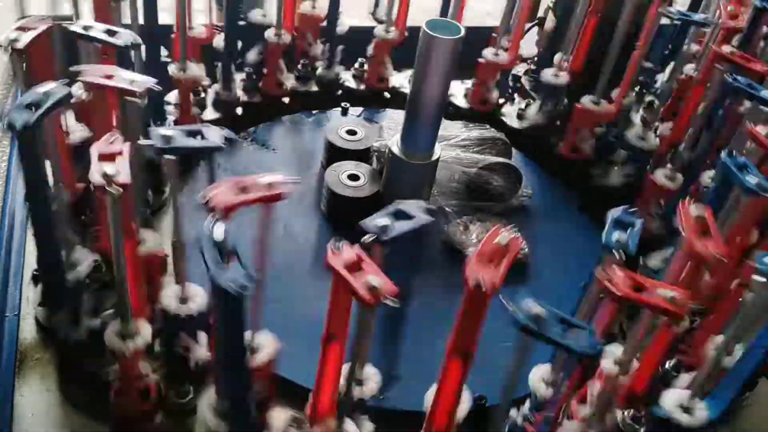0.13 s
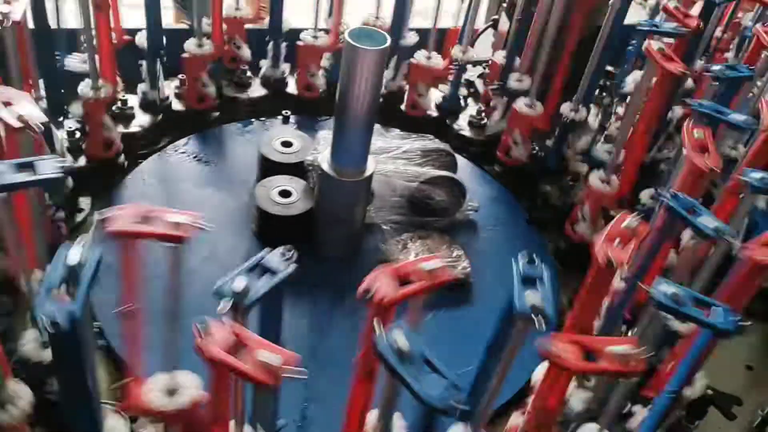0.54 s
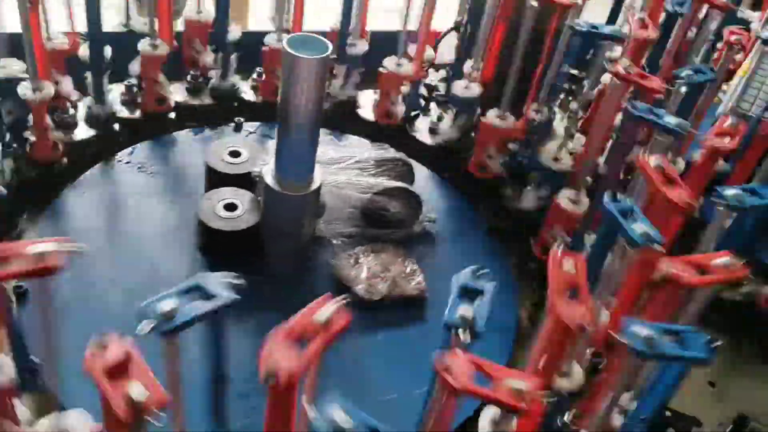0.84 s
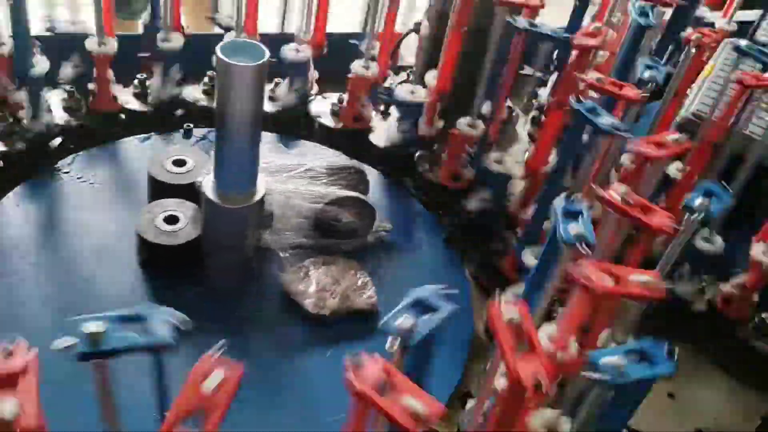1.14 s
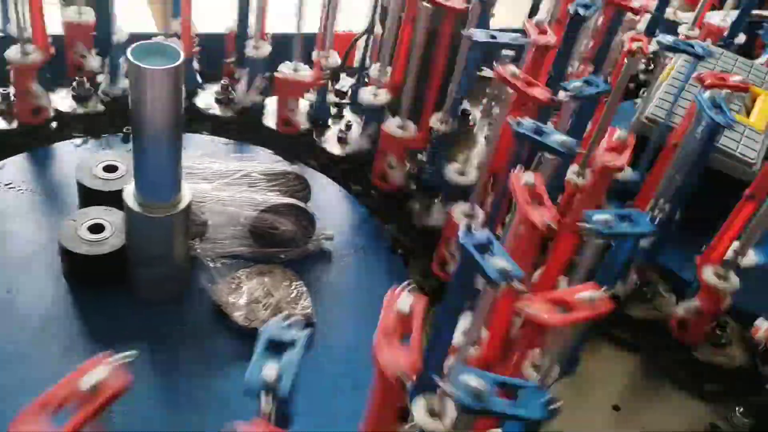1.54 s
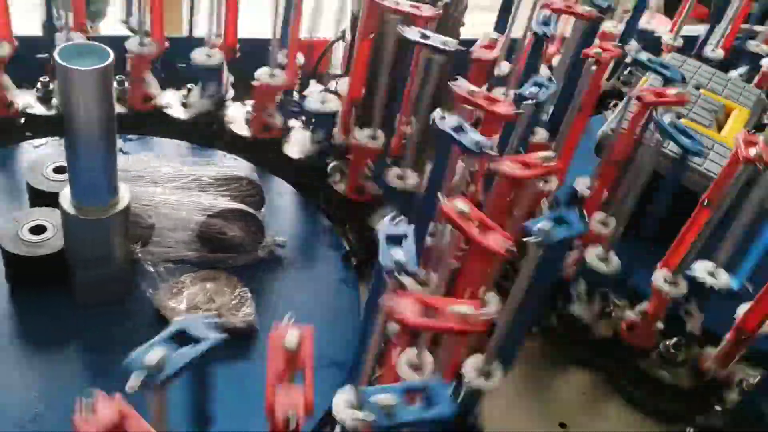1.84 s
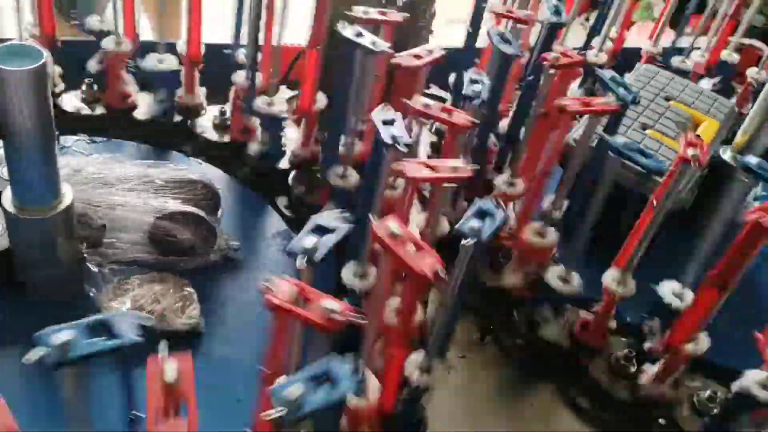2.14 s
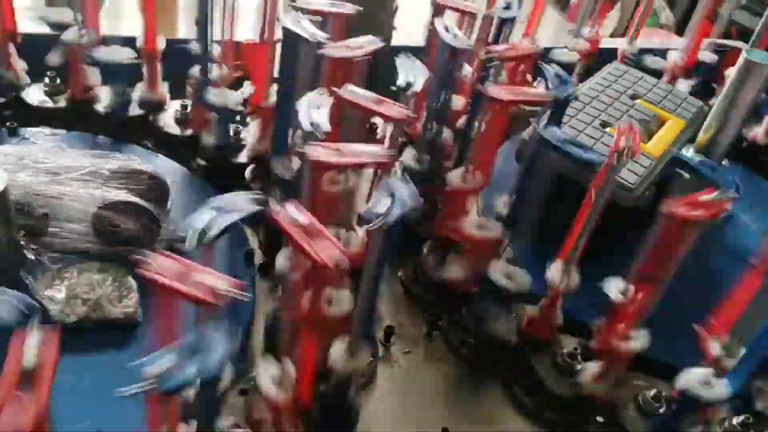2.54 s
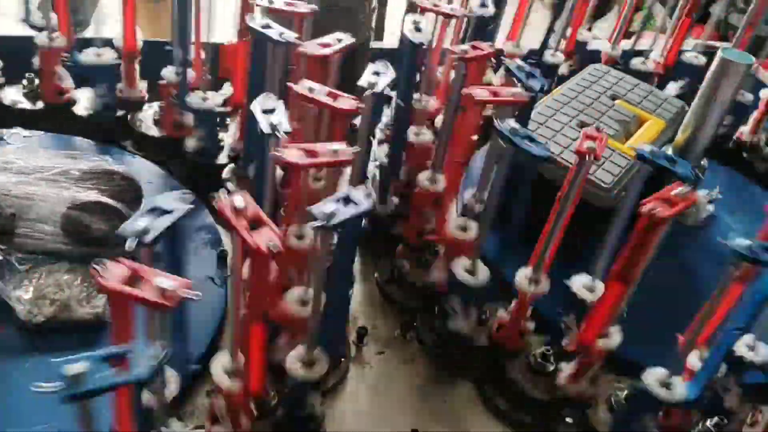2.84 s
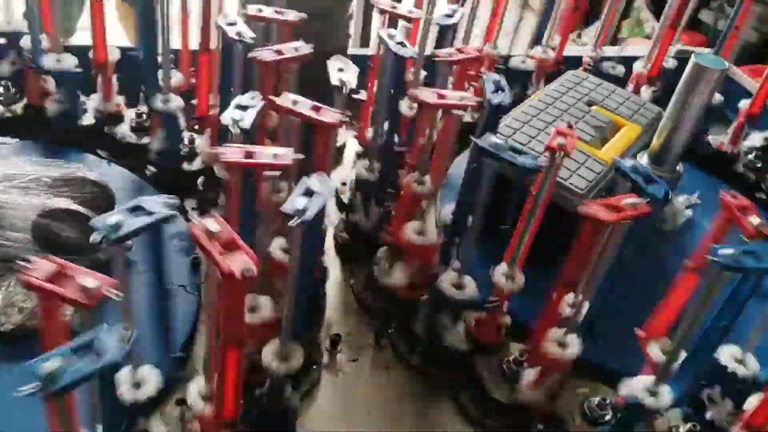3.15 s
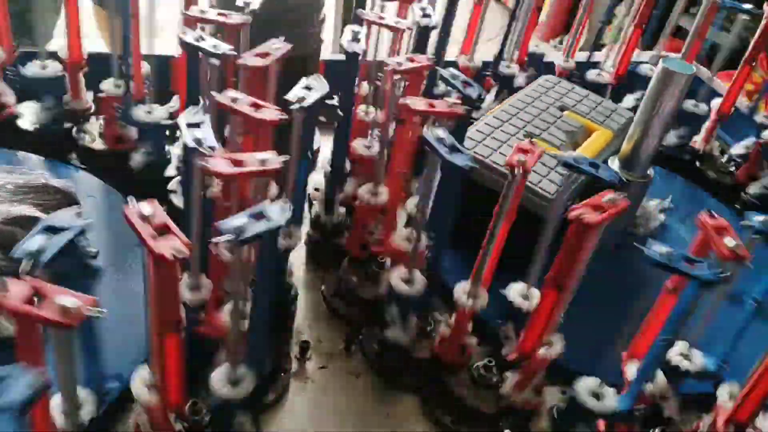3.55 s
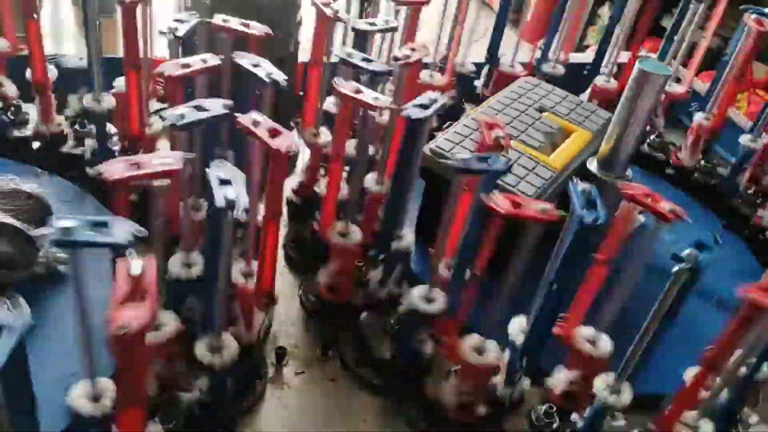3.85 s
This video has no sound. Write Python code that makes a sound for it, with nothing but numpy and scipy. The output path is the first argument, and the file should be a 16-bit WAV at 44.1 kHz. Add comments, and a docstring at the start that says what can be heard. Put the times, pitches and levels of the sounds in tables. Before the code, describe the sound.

Close up in a workshop, a fast braiding machine makes a dense, bright jingle of spindles over quick rhythmic knocking and a low rumble. Short metallic clashes, rings and scrapes stand out as the clatter carries on without pause.

```python
"""Braiding machine in a workshop

Dozens of steel spindles jingle as they weave past, heard from just above their ring. Five times
a cycle the horn gears knock the deck and clack against the carriers, while the frame drones on
multiples of the cycle. Clashes, scrapes, thuds and faint whistles poke out of the clatter.
The sound fades in, and the balance shifts as the microphone drifts across."""
import sys
import numpy as np
from scipy import signal
from scipy.fft import rfft, irfft, next_fast_len
from scipy.io import wavfile
from scipy.ndimage import uniform_filter1d, map_coordinates

SR = 44100
rng = np.random.default_rng(int(sys.argv[2]) if len(sys.argv) > 2 else 0)


def persist_wave(psi):
    """Save psi, clipped to +-1, as 16-bit WAV."""
    counts = np.round(np.clip(psi, -1, 1) * 32767).astype(np.int16)
    wavfile.write(sys.argv[1], SR, np.atleast_2d(counts).T)


N = 176400
TIME = np.arange(N) / SR
CYCLE_HZ, ROOM_T60_S = 14.19, 0.34


# Bright steel colour of the spindles. Each row: frequency in Hz, gain in dB.
SPINDLE_EQ = [(1900, -24.5), (3100, -5.5), (3600, -5), (4300, -3.5), (5000, -5), (5900, -4.5), (6350, -3.5),
              (6800, -1.5), (7500, 0.34), (8200, -3), (9000, -8), (9800, -12), (10400, -20), (11400, -21),
              (13000, -19.5), (14300, -17.5), (15700, -25.5)]
# Spindle fader as the microphone drifts. Each row: time in seconds, level in dB.
SPINDLE_FADER = [(0.4, -21), (0.6, -20), (0.8, -20), (1.07, -20), (1.2, -22.5), (1.5, -24.5), (1.85, -24.5),
                 (2.05, -25), (2.25, -24.5), (2.85, -25), (3.25, -24.5), (3.5, -25.5), (3.75, -24),
                 (4.0, -25)]
# Drift of the jingle from left to centre. Each row: time in seconds, left over right in dB.
SPINDLE_BALANCE = [(.5, 2), (1.3, 0.1), (2.1, -0.5), (4, -0.5)]
def spindles():
    """Loose spindles tick and clink, hardest once a cycle, and merge into a bright jingle."""
    beats = np.arange(0, N / SR, 1 / 900)  # 900 ticks a second
    jitter, scatter_db = rng.standard_normal((len(beats), 2)).T
    ticks = bursts(impulses(beats + 0.002 * jitter, amp(scatter_db)), t60=0.017, wet_db=11)
    chinks = amp(-9.5) * curve(DEFINITION) * clinks(t60=0.2, scatter_db=7.5, count=2200)
    power = 1 + 0.088 * np.cos(2 * np.pi * CYCLE_HZ * (TIME - 0.02))
    jingle = shimmer((ticks + chinks) * np.sqrt(power), depth_db=2.2, bins=3, frames=16)
    pan = amp(np.array([[0.5], [-0.5]]) * curve(SPINDLE_BALANCE))
    return amp(curve(SPINDLE_FADER) - 0.5) * pan * radiate(jingle, SPINDLE_EQ)


def clinks(t60, scatter_db, count, low_hz=3811, high_hz=9580):
    """Small steel parts ring briefly, each at its own pitch."""
    t = TIME[:SR // 18]
    onset, pitch, right_phase = rng.random((3, count, 1))
    hz = low_hz * (high_hz / low_hz) ** pitch
    strength = amp(scatter_db * rng.uniform(-1, 1, (count, 1)))
    envelope = strength * amp(-60 * t / t60) * (1 - t / t[-1])
    samples = ((onset * N).astype(int) + np.arange(len(t))).ravel()
    pings = [envelope * np.sin(2 * np.pi * (hz * t + phase)) for phase in (0, right_phase)]
    return unit(np.array([np.bincount(samples, side.ravel(), N)[:N] for side in pings]))


# Accents of the five gear contacts in a cycle. Each row: deck knock in dB, carrier clack in dB.
GEAR_ACCENTS = [(-5, 9), (-1.5, 10), (-6, 12.5), (-2, 4), (-4, 13.5)]
def gear_hits(column, scatter_db, jitter_s):
    """Gears make contact in a near-even pulse, accented by their place in the cycle."""
    accents_db = np.tile(np.array(GEAR_ACCENTS)[:, column], int(N / SR * CYCLE_HZ + 1))
    beats = 0.001 + np.arange(len(accents_db)) / (CYCLE_HZ * len(GEAR_ACCENTS))
    jitter, scatter = rng.standard_normal((len(beats), 2)).T
    return impulses(beats + jitter_s * jitter, amp(accents_db + scatter_db * scatter))


# Hard upper-mid colour of the carriers. Each row: frequency in Hz, gain in dB.
CARRIER_EQ = [(1060, -26), (1800, -4.5), (2290, 1), (3100, -6), (4030, -44), (6820, -120)]
# Carrier fader as the microphone drifts. Each row: time in seconds, level in dB.
CARRIER_FADER = [(0.4, -28.5), (0.7, -28.5), (1.0, -27.5), (1.3, -29), (1.6, -28.5), (1.85, -30.5),
                 (2.05, -31.5), (2.3, -31), (2.43, -31.5), (2.65, -30), (2.87, -31.5), (3.0, -31.5),
                 (3.12, -32), (3.45, -32.5), (3.7, -31), (4.0, -32.5)]
def carriers():
    """Carrier feet clack as they are handed from gear to gear."""
    clacks = bursts(gear_hits(column=1, scatter_db=0.5, jitter_s=0.0012), t60=0.19, wet_db=3.5)
    clacks = shimmer(clacks, depth_db=2.27, bins=4, frames=10)
    return amp(curve(CARRIER_FADER)) * radiate(clacks, CARRIER_EQ)


# Midrange body of the deck plate. Each row: frequency in Hz, gain in dB.
DECK_EQ = [(130, -19), (220, -3.5), (253, -2), (286, -2.5), (469, -1.5), (521, -4.5), (584, -0.9), (852, 2),
           (1240, -1.5), (1460, 1), (1800, -2.5), (2340, -20), (3960, -120)]
# Deck fader as the microphone drifts. Each row: time in seconds, level in dB.
DECK_FADER = [(0.4, -26), (0.6, -26), (1.08, -26), (1.2, -31), (1.45, -33), (1.9, -32), (2.1, -32.5),
              (2.23, -33), (2.45, -32.5), (2.9, -32), (3.35, -32.5), (3.55, -32), (4.0, -31)]
def deck():
    """Horn gears knock the deck plate."""
    knocks = bursts(gear_hits(column=0, scatter_db=1.5, jitter_s=0.0009), t60=0.048, wet_db=10)
    knocks = shimmer(knocks, depth_db=1.27, bins=3, frames=10)
    return amp(curve(DECK_FADER) - 0.5) * radiate(knocks, DECK_EQ)


# Low rumble of the frame. Each row: frequency in Hz, gain in dB.
FRAME_EQ = [(25, -42), (40, -29), (60, -3.5), (85, 0), (120, 3.5), (160, 1), (220, -4.5), (300, -32),
            (480, -90)]
# Partials of the drone. Each row: multiple of the cycle rate, level in dB.
DRONE_PARTIALS = [(4, -23), (6, -10.5), (9, -9), (13, -16), (18, -17.5)]
# Frame fader as the microphone drifts. Each row: time in seconds, level in dB.
FRAME_FADER = [(.25, -58), (.45, -39), (1.15, -38), (1.3, -34), (1.48, -39), (1.62, -30.5), (1.85, -36),
               (1.93, -38.5), (2.45, -39.5), (2.65, -43), (3.1, -41.5), (3.5, -46), (4, -44)]
def frame():
    """The frame rumbles and drones, wavering as parts swing nearer and farther."""
    rumble = radiate(rng.standard_normal((2, N)) * amp(0.5 * wobble(26)), FRAME_EQ)
    drone = 0
    for multiple, db in DRONE_PARTIALS:
        sway = amp(5 * wobble(5.95))
        phase = 2 * np.pi * multiple * CYCLE_HZ * TIME + 0.5 * wobble(4.33)
        drone += amp(db) * unit(sway * np.sin(phase))
    lean_left = amp([[1.6], [-1.6]])
    return amp(curve(FRAME_FADER)) * (amp(-1) * rumble + lean_left * drone)


# Spindles clashing close by. Each row: start in seconds, level in dB.
SPINDLE_CLASHES = [(.567, -31), (1.273, -32), (1.521, -27), (1.571, -28), (1.858, -24), (1.944, -28),
                   (2.196, -29), (2.264, -25.5), (2.622, -29), (2.767, -29), (3.046, -24.5), (3.388, -29.5),
                   (3.458, -24), (3.694, -27), (3.751, -32), (3.842, -32)]
# Harder knocks on the deck. Each row: start in seconds, level in dB.
DECK_KNOCKS = [(1.108, -29), (1.561, -28.5), (1.879, -28), (2.085, -29.5), (2.228, -27), (2.978, -33),
               (3.231, -29.5), (3.339, -36), (3.496, -33.5), (3.587, -31), (3.945, -29.5)]
def impacts():
    """Spindle clashes and deck knocks cut through the clatter."""
    return strikes(SPINDLE_CLASHES, SPINDLE_EQ, t60=0.054) + strikes(DECK_KNOCKS, DECK_EQ, t60=0.094)


# Carriers rubbing the track. Each row: peak time in seconds, half-length in seconds,
# pitch in Hz, glide in Hz per second, level in dB.
TRACK_SCRAPES = [(2.107, .035, 2284, 0, -27.5), (2.212, 0.061, 2630, -500, -30.5),
                 (2.295, 0.067, 2327, -1200, -26), (2.363, 0.022, 2400, 0, -30),
                 (2.592, 0.041, 2620, -800, -29.5), (2.676, .05, 2504, -1200, -29),
                 (2.687, 0.037, 1940, 0, -30.5), (2.903, 0.03, 2530, 0, -34), (2.986, 0.058, 2484, 0, -28),
                 (3.25, .03, 2250, 0, -30), (3.463, 0.079, 2290, -500, -31), (3.956, .025, 2720, 0, -28)]
def scrapes():
    """A carrier rubs the track: a broad metallic ring, sometimes sinking as it passes."""
    out = 0
    for peak, half_length, hz, glide, db in TRACK_SCRAPES:
        tone = rough_tone(hz, width_hz=110, bend_turns=glide * (TIME - peak) ** 2 / 2)
        out += amp(db + 1.3) * tone * bell_curve(peak, half_length)
    return out


# Ringing steel. Each row: peak time in seconds, half-length in seconds, pitch in Hz, level in dB.
STEEL_RINGS = [(1.283, 0.11, 6800, -28), (1.33, .03, 5530, -30), (1.45, .04, 5490, -32),
               (1.53, .05, 4250, -32), (1.525, 0.045, 7450, -28), (1.64, 0.046, 4800, -35),
               (1.86, .04, 4850, -31), (1.86, .035, 7500, -34), (1.96, .04, 7570, -27),
               (2.112, .04, 3800, -32.5), (2.19, 0.094, 6820, -33), (2.215, .04, 5080, -30),
               (2.36, .04, 4100, -37), (2.642, .05, 4430, -35), (2.66, 0.044, 7440, -29),
               (2.77, .05, 7000, -31), (3.057, .04, 4830, -31), (3.21, .04, 3940, -33),
               (3.24, 0.044, 4850, -31), (3.25, .05, 4310, -32), (3.34, .07, 7300, -30.5),
               (3.352, 0.069, 858, -36), (3.472, .045, 5000, -29.5), (3.62, 0.047, 5950, -32.5),
               (3.78, 0.12, 8780, -43), (3.82, .04, 5870, -29), (3.9, .035, 4390, -37)]
def rings():
    """Now and then a passing spindle rings out of the clatter."""
    return amp(2) * swells(STEEL_RINGS, width_hz=65)


# Hollow thuds. Each row: peak time in seconds, half-length in seconds, pitch in Hz, level in dB.
HOLLOW_THUDS = [(.55, 0.1, 581, -34), (.63, 0.036, 388, -36), (.7, .13, 256, -37.5),
                (1.3, 0.043, 255.6, -31.5), (1.31, 0.071, 128.8, -34), (1.61, 0.032, 170.6, -36),
                (1.66, 0.056, 124.4, -36), (1.66, .06, 85.1, -35), (1.77, 0.049, 100, -33.5),
                (1.86, 0.027, 131.5, -29), (1.98, 0.032, 84.8, -35), (2.04, 0.031, 125, -34),
                (2.26, 0.018, 384, -36), (2.99, 0.045, 253.7, -30), (3.02, .025, 204, -31),
                (3.1, 0.029, 465, -34.5), (3.24, 0.03, 487, -34.5)]
def thuds():
    """Heavier jolts boom in the frame and deck."""
    return swells(HOLLOW_THUDS, width_hz=12)


# Thin whistles. Each row: start in seconds, end in seconds, pitch in Hz, level in dB.
GUIDE_WHISTLES = [(1.06, 1.89, 6820, -36), (1.1, 1.59, 2280, -33.5)]
def whistles():
    """Faint metallic whistles, likely from dry guides, come and go."""
    out = 0
    for start, end, hz, db in GUIDE_WHISTLES:
        progress = np.clip((TIME - start) / (end - start), 0, 1)
        out += amp(db) * rough_tone(hz, width_hz=45) * np.sqrt(np.abs(np.sin(np.pi * progress)))
    return out


def bursts(hits, t60, wet_db):
    """Every hit sets off a short noise burst and its diffuse echo in the workshop."""
    t = TIME[:SR // 3]
    direct = unit(amp(-60 * t / t60))
    echo = amp(wet_db) * unit(amp(-60 * t / ROOM_T60_S))
    power = signal.fftconvolve(hits ** 2, direct ** 2 + echo ** 2)[:N]
    return unit(np.sqrt(np.abs(power)) * rng.standard_normal((2, N)))


def strikes(table, eq, t60, rise_s=0.0023):
    """Single blows: a quick attack and a short decay in the colour of the struck part."""
    starts, db = np.transpose(table)
    t = TIME[:SR // 4]
    shape = (1 - np.exp(-t / rise_s)) * amp(-60 * t / t60)
    envelope = signal.fftconvolve(impulses(starts, amp(db)), shape / shape.max())[:N]
    return envelope * radiate(rng.standard_normal((2, N)), eq)


def swells(table, width_hz):
    """A resonance swells and dies away for each row."""
    return sum(amp(db) * rough_tone(hz, width_hz) * bell_curve(peak, half_length)
               for peak, half_length, hz, db in table)


def rough_tone(hz, width_hz, bend_turns=0):
    """A narrow, unsteady resonance in stereo; extra phase bends its pitch."""
    tone = np.exp(2j * np.pi * (hz * TIME + bend_turns))
    mid, side = (np.real((wobble(2 * width_hz) + 1j * wobble(2 * width_hz)) * tone) * gain
                 for gain in mid_side(hz))
    return port_gains(hz)[:, None] * unit(np.array([mid + side, mid - side]))


# How far single parts stand out of the even roar. Each row: time in seconds, amount from 0 to 1.
DEFINITION = [(1.1, 0.49), (1.2, 0.91)]
def shimmer(x, depth_db, bins, frames):
    """Resonances come and go as the parts move, in patches of bins by frames, at an even level."""
    _, t, spectrum = signal.stft(x, SR, nperseg=1024, noverlap=768)
    patches = rng.standard_normal(spectrum.shape[1:])
    for axis in (0, 1, 0, 1):
        patches = uniform_filter1d(patches, (bins, frames)[axis], axis)
    gain = amp(depth_db * unit(patches) * np.interp(t, *np.transpose(DEFINITION)))
    gain /= np.sqrt(np.mean(gain ** 2, 0))
    return signal.istft(spectrum * gain, nperseg=1024, noverlap=768)[1][:, :N]


def radiate(pair, eq):
    """Colour two noises by the part's body and spread them in stereo; the mono mix has rms 1."""
    mid, side = filtered(pair, lambda hz: amp(along(eq, hz)) * mid_side(hz))
    stereo = filtered(np.array([mid + side, mid - side]), port_gains)
    return stereo / np.std(stereo.mean(0))


# Stereo image of the machine. Each row: frequency in Hz, left-right correlation.
STEREO_LIKENESS = [(100, 1), (300, 0.89), (600, 0.65), (950, 0.43), (1250, -0.21), (1900, -0.17),
                   (2700, 0.22), (3400, -0.023), (5700, 0.1), (7000, -.05), (12000, 0.052)]
def mid_side(hz):
    """Mid and side gains: narrow in the bass, wide in the treble."""
    angle = np.arccos(np.clip(along(STEREO_LIKENESS, hz), -1, 1)) / 2
    return np.array([np.cos(angle), np.sin(angle)])


# Colour of the two microphone ports. Each row: frequency in Hz, left over right in dB.
PORT_BALANCE = [(100, 3.3), (750, 2.9), (1250, 0.3), (1850, -0.7), (2400, -6.6), (3000, -5.8),
                (3800, -13.7), (4350, -15.7), (5400, -2.0), (6200, 0.0), (6900, 5.0), (7700, 1.7),
                (8600, -6.4), (9500, -13.9), (10100, -9.4), (10700, -2.5), (11400, 1.5), (12300, 5.8),
                (14200, 9.0), (15500, 8.9)]
def port_gains(hz):
    """The ports tip each frequency left or right at constant power."""
    left = amp(along(PORT_BALANCE, hz))
    return np.array([left, np.ones_like(left)]) * np.sqrt(2) / np.hypot(left, 1)


def amp(db):
    """Decibels to gain."""
    return 10 ** (np.asarray(db) / 20)


def unit(x):
    """Scale to rms 1."""
    return x / np.sqrt(np.mean(x ** 2) + 1e-20)


def along(points, hz):
    """Read a frequency table on a log axis."""
    freqs, values = np.transpose(points)
    return np.interp(np.log(hz + 1), np.log(freqs + 1), values)


def curve(rows):
    """Read a time table at every sample."""
    return np.interp(TIME, *np.transpose(rows))


def bell_curve(peak_s, half_length_s):
    """A smooth swell, 17 dB down at half_length_s either side of its peak."""
    return np.exp(-2 * ((TIME - peak_s) / half_length_s) ** 2)


def wobble(rate):
    """A smooth random curve, rate knots a second."""
    knots = rng.standard_normal(int(N * rate / SR) + 4)
    return np.interp(TIME, TIME[::64], map_coordinates(knots, [TIME[::64] * rate]))


def filtered(x, response):
    """Filter x by a gain that depends on frequency."""
    size = next_fast_len(N + SR // 4)
    return irfft(rfft(x, size) * response(np.fft.rfftfreq(size, 1 / SR)), size)[..., :N]


def impulses(times, sizes):
    """One-sample hits at the given times."""
    inside = (times >= 0) & (times < (N - 1) / SR)
    return np.bincount((times[inside] * SR).astype(int), sizes[inside], N)


def scene():
    """The running machine, with its passing accents on top."""
    machine = frame() + deck() + carriers() + spindles()
    return machine + impacts() + scrapes() + rings() + thuds() + whistles()


def record(dry):
    """A moment of silence, a quick fade-in, and the very top of the treble cut away."""
    start_s, top_hz = 0.21, 15850
    fade = (TIME > start_s) * np.clip(0.11 + (TIME - start_s) / 0.24, 0, 1)
    return filtered(dry * fade, lambda hz: hz < top_hz)


dry = scene()
out = record(dry)
persist_wave(out)
```